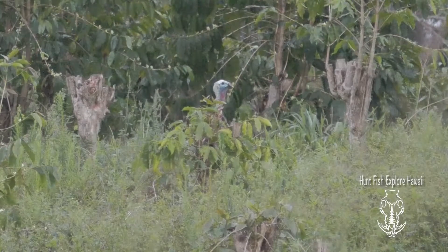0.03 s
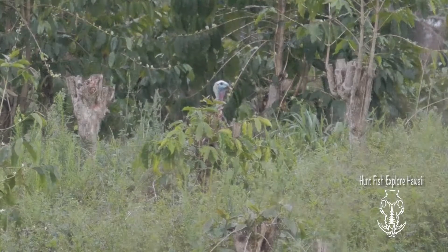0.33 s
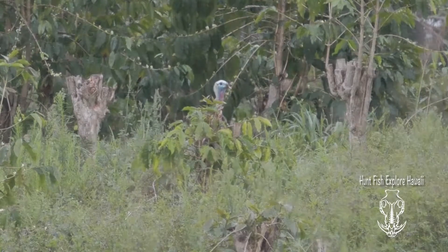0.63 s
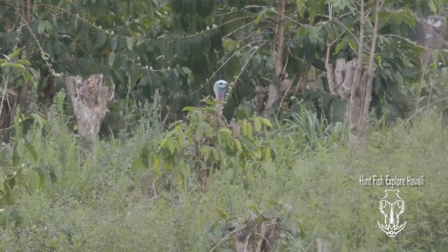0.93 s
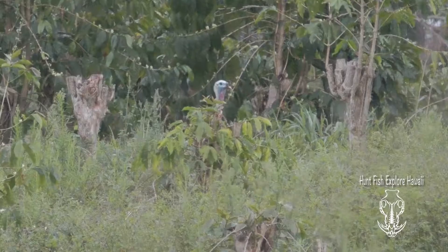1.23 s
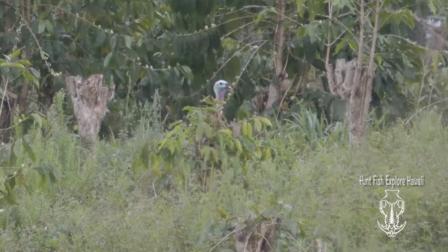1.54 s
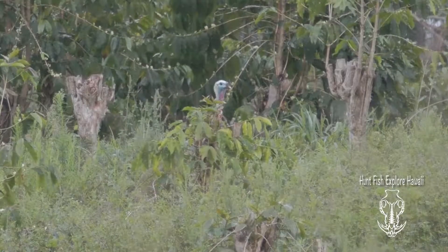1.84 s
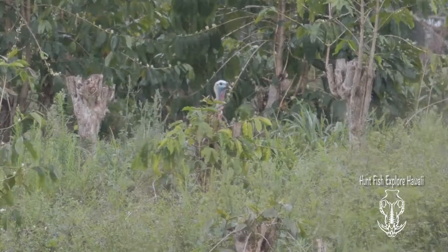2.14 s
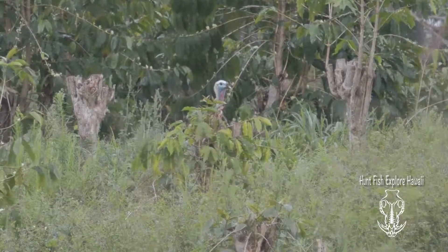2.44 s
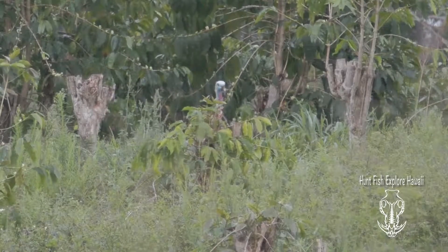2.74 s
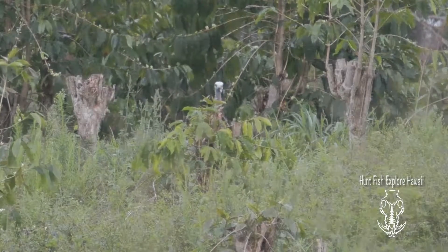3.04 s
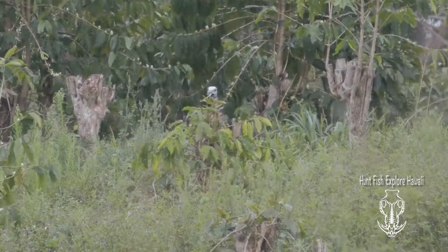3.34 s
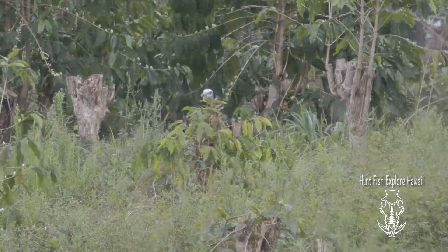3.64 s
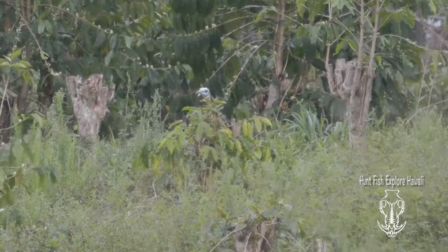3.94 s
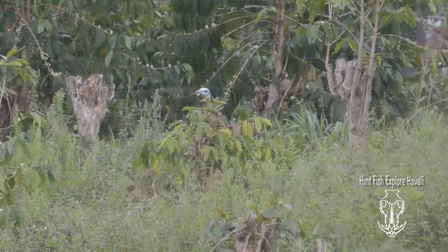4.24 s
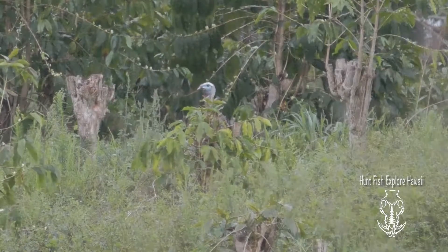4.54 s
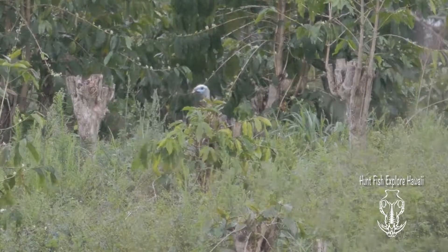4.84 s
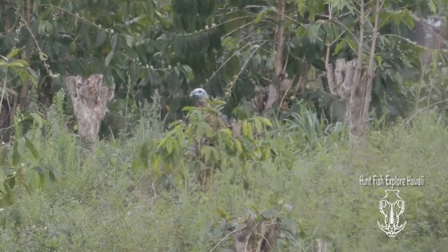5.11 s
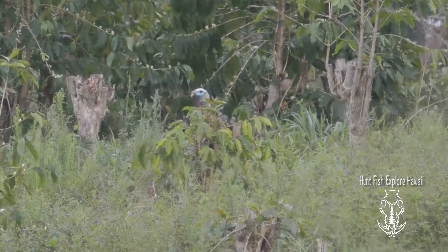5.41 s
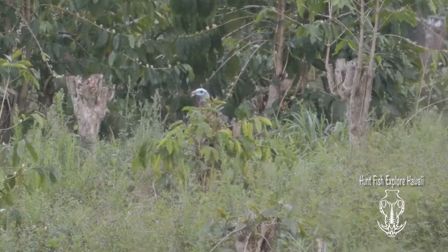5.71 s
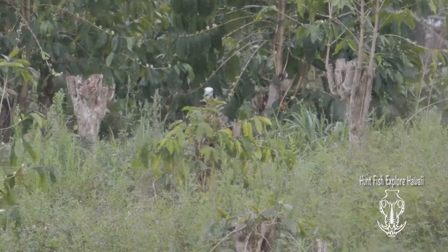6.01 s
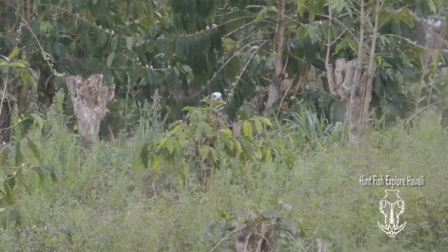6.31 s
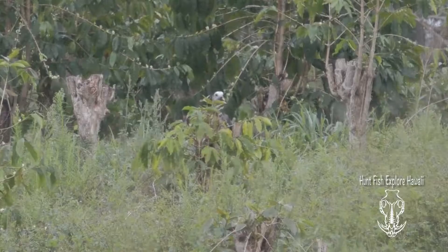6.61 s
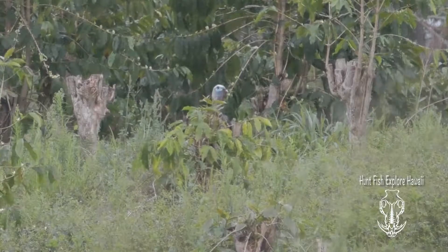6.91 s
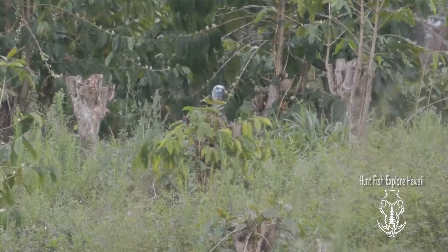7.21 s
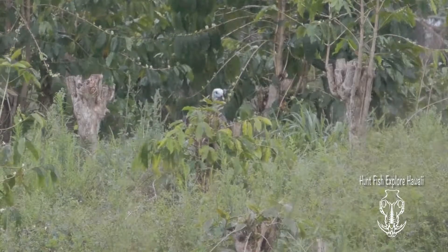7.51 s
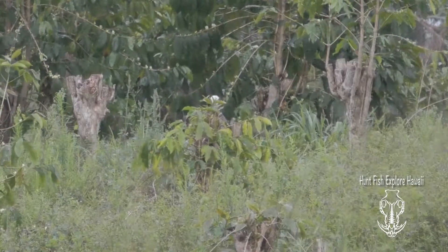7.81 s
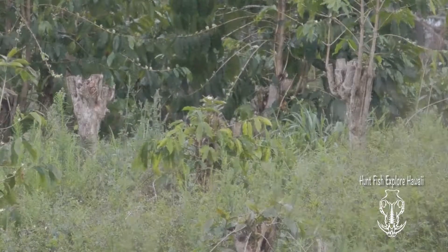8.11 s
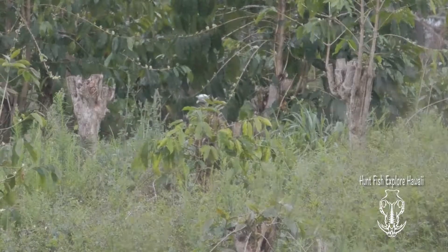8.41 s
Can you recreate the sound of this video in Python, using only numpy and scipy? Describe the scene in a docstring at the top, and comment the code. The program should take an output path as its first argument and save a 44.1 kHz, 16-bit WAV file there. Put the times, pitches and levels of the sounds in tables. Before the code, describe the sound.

At a forest edge, a wild turkey hen close to the microphones gives one short putt and a few sharp clucks, then twelve evenly paced yelps, each breaking from a high whistle into a raspy note. Soft whines slip between them, and a low rumble on the right follows her loud calls. Crickets trill, leaves rustle and small birds twitter far off, carrying on after she stops.

```python
"""A forest edge, tall grass, a pair of microphones. Leaves rustle, crickets trill, small birds twitter
far off. Close by, a wild turkey hen gives a putt, a few sharp clucks and twelve yelps with soft whines
between. Each yelp leaves her syrinx as a high whistle and breaks down into a raspy, reedy note; trunks
and leaves scatter it. Her loud calls set off a rumble in the right channel, and the background dips
under them. A faint low hum comes in near the end."""
import sys
import numpy as np
from scipy import signal
from scipy.fft import rfft, irfft
from scipy.io import wavfile
from scipy.ndimage import uniform_filter1d

SR = 44100
rng = np.random.default_rng(int(sys.argv[2]) if len(sys.argv) > 2 else 0)


def generate_wav(signal):
    """Clip the signal to [-1, 1] and save it as 16-bit WAV at the path in sys.argv[1]."""
    frames = np.transpose(np.atleast_2d(signal))
    scaled = np.clip(frames, -1, 1) * 32767
    pcm = np.round(scaled).astype(np.int16)
    wavfile.write(sys.argv[1], SR, pcm)


N = 377055
TIME = np.arange(N) / SR


def from_db(db):
    """Decibels to gain."""
    return 10 ** (np.asarray(db) / 20)


def rms_one(x):
    """Scale to rms 1."""
    return x / np.sqrt(np.mean(x ** 2) + 1e-20)


def at_hz(points, hz, column=1):
    """Read a column of a table on a log-frequency axis."""
    table = np.array(points)
    return np.interp(np.log(hz), np.log(table[:, 0]), table[:, column])


def band(x, low_hz, high_hz, order=2):
    """Butterworth band-pass."""
    return signal.sosfilt(signal.butter(order, [low_hz, high_hz], "band", fs=SR, output="sos"), x)


def drift(rate_hz, size=N):
    """Smooth random wander of spread 1."""
    pole = np.exp(-20 * np.pi * rate_hz / SR)
    noise = rng.standard_normal(size // 10 + 4002)
    slow = signal.lfilter([1], [1, -2 * pole, pole * pole], noise)[4000:]
    return np.interp(np.arange(size) / 10, np.arange(len(slow)), rms_one(slow))


def past(age, mark_s=0):
    """Time since a mark, zero before it."""
    return np.maximum(age - mark_s, 0)


def add(out, start_s, sound):
    """Mix a sound in at its time."""
    i = max(0, round(start_s * SR))
    out[..., i:i + sound.shape[-1]] += sound[..., :N - i]


def glide(length_s, start_hz, end_hz):
    """Phase and rounded envelope of a sliding note."""
    progress = np.linspace(0, 1, max(int(length_s * SR), 20))
    hz = start_hz * (end_hz / start_hz) ** progress * (1 + 0.017 * drift(120, len(progress)))
    return 2 * np.pi * np.cumsum(hz) / SR, 2 * np.sin(np.pi * progress)


# spectrum of the far foliage: f/Hz, relative level/dB
RUSTLE = [(25, -8.5), (60, -7.5), (120, 1), (300, -3), (550, -11), (800, -15.5), (1200, -7), (2400, -4),
          (3700, -6.5), (5200, -12.5), (7500, -23), (10000, -23.5), (15500, -23.5)]
# how alike it is at the two microphones: f/Hz, correlation
LIKENESS = [(60, 0.42), (300, 0.32), (1200, 0.52), (3000, 0.73), (5000, 0.78), (7000, 1), (15000, 0.32)]
def breeze(level_db=-50.5):
    """Air moving through distant leaves: a smooth rustle, wide in the bass."""
    hz = np.maximum(np.arange(N // 2 + 1) * SR / N, 1)
    alike = at_hz(LIKENESS, hz)
    mid, side = rfft(rng.standard_normal((2, N))) * from_db(at_hz(RUSTLE, hz))
    air = irfft(np.sqrt(1 + alike) * mid + np.sqrt(1 - alike) * side * [[1], [-1]], N)
    return from_db(level_db) * rms_one(air)


# the cricket chorus, opening and closing stretch: t/s, level/dB before trim
CHORUS = [
    [(0.0, -43.5), (0.834, -42.5), (1.2, -44.5)],
    [(6.9, -43.5), (7.35, -44), (8.55, -44)],
]
def crickets(count=15, centre_hz=4374, spread_hz=135, stroke_hz=28.49, sweep=0.0298, trim_db=-3):
    """Each wing stroke is a short falling tone; every insect keeps its own pitch, pace and place."""
    out = np.zeros((2, N))
    for k, detune in enumerate(np.linspace(-2, 2, count)):
        pace, start = rng.normal(0, 1, 2)
        stroke = (stroke_hz * (1 + .09 * pace) * TIME + start + .15 * drift(5)) % 1
        hz = (centre_hz + spread_hz * detune) * (1 + sweep * (.5 - stroke) + 0.0089 * drift(198.2))
        phase = 2 * np.pi * (np.cumsum(hz) / SR % 1)
        lead = np.cos(2 * k) / 2 * np.array([[1], [-1]])
        overtones = from_db(-19.5) * np.sin(2 * phase) + from_db(-25) * np.sin(3 * phase + lead)
        tone = np.sin(phase + lead) + overtones
        out += tone * np.sin(np.pi * stroke) ** 2 * np.exp(-detune ** 2 / 4)
    times, db = np.vstack(CHORUS).T
    return from_db(np.interp(TIME, times, db) + trim_db) * rms_one(out)


# the nearer songbirds: t/s, length/s, start f/Hz, end f/Hz, level/dB before trim
TWEETS = [(0, .051, 5270, 5000, -50), (0.413, 0.036, 5400, 6900, -57), (0.45, .02, 6900, 5000, -55),
          (0.777, .03, 6700, 5140, -58), (0.871, .028, 6200, 5100, -54.5), (1.097, .056, 7000, 5000, -57.5),
          (1.139, 0.068, 6300, 4860, -52), (1.475, 0.052, 5400, 5000, -52), (1.653, 0.071, 5600, 6870, -58),
          (1.866, 0.048, 5740, 4800, -56), (2.178, 0.043, 5000, 6200, -55),
          (2.211, 0.049, 5970, 5670, -53.5), (2.352, .13, 5670, 4480, -53), (2.697, .047, 5250, 6300, -61),
          (6.979, 0.096, 6950, 5100, -60.5), (7.444, .14, 7900, 7600, -65)]
def songbirds(count=130, far_db=-63.5, warble_db=-60, trim_db=-0.5):
    """Thin quick slurs, a few near and many far that thin out with time, over a lower distant warble."""
    notes = list(TWEETS)
    for when, length, high, end in rng.random((count, 4)):
        notes.append((when ** 1.5 * N / SR, 0.021 + 0.036 * length,
                      5600 + 2000 * high, 4800 + 1200 * end, far_db - 4 * high))
    for when, length, high, end in rng.random((count, 4)):
        hz = 2200 + 1300 * high
        notes.append((when * N / SR, 0.0398 + 0.069 * length, hz, hz * (.88 + 0.2075 * end), warble_db))
    out = np.zeros(N)
    for start_s, length_s, start_hz, end_hz, db in notes:
        phase, swell = glide(length_s, start_hz, end_hz)
        add(out, start_s, from_db(db + trim_db) * swell * np.sin(phase))
    return forest(np.array([out, out]), near_db=-8, near_t60=.12, far_db=-13, far_t60=.6)


def forest(x, near_db=-15, near_t60=0.071, far_db=-33, far_t60=1.0, stir_hz=45):
    """A quick scatter of echoes from near bushes, and a faint long one blurred by moving leaves."""
    t = TIME[:SR]
    sparse = rng.standard_normal((2, SR)) * (rng.random((2, SR)) < .05)
    echoes = band(sparse, 740, 5400, order=1) * (t > .006)
    tails = [rms_one(echoes * from_db(-60 * t / t60)) / np.sqrt(SR) for t60 in (near_t60, far_t60)]
    near, far = [signal.fftconvolve(x, tail, axes=1)[:, :N] for tail in tails]
    return x + from_db(near_db) * near + from_db(far_db) * far * drift(stir_hz)


# the hen, close by, one clear putt and one faint: t/s, f/Hz, level/dB, decay/s
PUTTS = [(.271, 1410, -18, 0.0041), (.992, 875, -44, 0.0071)]
def putts(rise_s=0.0019, lower_ratio=0.78):
    """With the beak closed, two partials ring for a few milliseconds."""
    out = np.zeros((2, N))
    t = TIME[:SR // 10]
    attack = 1 - np.exp(-(t / rise_s) ** 2)
    for start_s, hz, db, decay_s in PUTTS:
        ring = np.sin(2 * np.pi * hz * t) + 0.36 * np.sin(2 * np.pi * hz * lower_ratio * t)
        add(out, start_s, from_db(db) * ring * attack * np.exp(-t / decay_s))
    return out


def loudness(x):
    """Amplitude over a few milliseconds."""
    return np.sqrt(np.abs(uniform_filter1d(x ** 2, size=256)))


def dip(voice, depth_db=9.5, full_amplitude=0.22, recover_s=0.075):
    """Background gain: it sinks when a call is loud at the right microphone, then comes back."""
    log_push = np.log(np.clip(loudness(voice[1]) / full_amplitude, 1e-6, 1))
    held = np.maximum.accumulate(log_push + TIME / recover_s) - TIME / recover_s
    return from_db(-depth_db * np.exp(held))


# narrow peaks from ground reflections between hen and microphones:
# f/Hz, half width/Hz, level/dB above the valleys
GROUND_PEAKS = [(1469, 45, 6), (1674, 104, 4.5), (2282, 61, 5), (2405, 82, 3), (2770, 59, 8),
                (3090, 45, 7.5), (3748, 44, 6), (4060, 110, 4.5)]
def ground_reflection_db(hz, valley_db=-3.5):
    """Direct and reflected paths interfere, so a harmonic swells as it slides through a peak."""
    return valley_db + sum(db * np.exp(-((hz - peak) / width) ** 2) for peak, width, db in GROUND_PEAKS)


# from the hen to the microphones: f/Hz, left minus right level/dB, left lead/rad
BEARING = [(750, 6, 1), (1120, 4, 1.5), (1446, -3, -0.55), (1664, -5, -2.5), (2243, 6.5, 1.5),
           (2880, 7, -0.9), (3930, -5.5, -1), (5000, 0, 0.5)]
def at_microphones(level, phase, hz):
    """One partial as the pair hears it: level and phase differ with frequency."""
    tilt = from_db(at_hz(BEARING, hz))
    lead = at_hz(BEARING, hz, column=2) / 2
    pair = np.array([tilt * np.sin(phase + lead), np.sin(phase - lead)])
    return 2 * level / np.sqrt(1 + tilt ** 2) * pair


# her throat's colour on the upper harmonics: f/Hz, relative level/dB
THROAT = [(2200, -0.5), (2450, -2.5), (2800, -2.5), (3050, -7.5), (3750, -7), (4100, -7), (4500, -24),
          (5200, -23.5), (6000, -23), (6800, -28), (7500, -36.5), (8250, -35.5), (10000, -49),
          (14000, -48.5)]
def syrinx(pitch, first_db, octave_db, upper_db, beak_db, rough_s, pop_db, pop_hz):
    """Membranes buzz on one pitch: a whistle when high, reedy when low, raspy around rough_s."""
    flutter_hz, shimmer, fade_db = 130, .15, 1.1
    rough_width_s, attack_s, pop_s = .024, .003, .0033
    size = len(pitch)
    age = TIME[:size]
    rough = np.exp(-((age - rough_s) / rough_width_s) ** 2)
    # tight, high-pitched membranes hardly touch, so the high harmonics fade
    tight = np.clip((pitch - 790) / 140, 0, 1)
    jitter = (.0035 + .012 * rough) * drift(2 * flutter_hz, size)
    wobble = .004 * drift(25, size)
    pitch = pitch * (1 + jitter + wobble)
    phase = 2 * np.pi * np.cumsum(pitch) / SR
    shake = drift(flutter_hz, size)
    out = np.zeros((2, size))
    for k in range(1, 18):
        colour_db = at_hz(THROAT, k * pitch) + beak_db * (k > 3) - 6 * tight * np.sqrt(abs(k - 3))
        level = from_db(first_db if k == 1 else octave_db if k == 2 else upper_db + colour_db)
        if 2 <= k <= 5:
            level = level * from_db(ground_reflection_db(k * pitch))
        waver = 1 + shimmer * (.5 + 2 * rough) * (shake + drift(flutter_hz, size)) / 2
        # paths through the grass interfere: partials fade at each microphone, the overtones most
        paths = np.array([drift(40, size) for side in "LR"])
        fading = from_db(fade_db * min(k / 2, 2) * (paths + paths.mean(axis=0)))
        out += fading * at_microphones(level * waver, k * phase, k * pitch)
    # air leaks through the membranes once a cycle
    hiss = band(rng.standard_normal((2, size)), 1050, 5300) * (1 + np.cos(phase))
    out += from_db(upper_db) * (from_db(-26) + from_db(-19) * rough) * rms_one(hiss)
    # an abrupt start also pops the throat
    since = past(age, attack_s) / pop_s
    pop = from_db(pop_db) * since * np.exp(1 - since) * np.sin(2 * np.pi * pop_hz * age)
    out = (out + 2 * pop) * np.clip(age / attack_s, 0, 1)
    # a small beak radiates nothing far below the fundamental
    return band(out, 780, 15000, order=4)


# sharp clucks, close by: t/s, hold/s, f/Hz,
# relative level/dB of fundamental, octave and upper harmonics, beak lift/dB
CLUCKS = [(1.257, 0.027, 758.6, -29, -20, -27, -6.5), (1.401, 0.016, 737.4, -31, -17.3, -23.5, -7.5),
          (1.551, 0.016, 777, -17.5, -19.5, -22.5, -5), (1.777, 0.028, 742.4, -28, -17.5, -20.5, -7.5),
          (2.023, 0.018, 722, -30, -18.3, -22.5, -9), (2.277, 0.017, 778, -32, -24.5, -29, -10),
          (2.312, 0.018, 743, -34, -21.5, -26.5, -6)]
def clucks(length_s=.098, drop_hz=123.5, drop_s=0.00442, rise_hz_per_s=1020, knock_s=0.0097, trim_db=-2.7):
    """Abrupt notes whose pitch drops at once and creeps back; the fundamental is only a brief knock."""
    sag_db_per_s, release_db_per_s, beak_db_per_s = 102, 552, 119.5
    out = np.zeros((2, N))
    age = np.arange(0, length_s, 1 / SR)
    for start_s, hold_s, low_hz, first_db, octave_db, upper_db, beak_db in CLUCKS:
        pitch = low_hz + drop_hz * np.exp(-age / drop_s) + rise_hz_per_s * age
        release_db = -release_db_per_s * past(age, hold_s)
        reed_db = release_db - sag_db_per_s * age
        knock_db = release_db - np.interp(age, [knock_s / 2, knock_s], [0, 12])
        note = syrinx(pitch, first_db + knock_db, octave_db + 3 + reed_db, upper_db + .5 + reed_db,
                      beak_db + beak_db_per_s * age, rough_s=.012, pop_db=upper_db - 9, pop_hz=1068)
        add(out, start_s, note)
    return from_db(trim_db) * out


def rumble(voice, gain_db=-5.5, corner_hz=58, threshold=0.0019):
    """A lumpy low noise in the right channel that follows the shrill part of the calls."""
    low_noise = band(rng.standard_normal(N), 26, corner_hz, order=1)
    lumps = rms_one(band(low_noise, 5.1, 360, order=1))
    shrill = loudness(band(voice[1], 2540, 5400))
    return from_db(gain_db) * lumps * np.maximum(shrill - threshold, 0) * np.array([[0], [1]])


# the run of yelps, close by: break t/s, whistle before it/s, hold after it/s, end after it/s, fall/s,
# low f/Hz, scoop/Hz, relative level/dB of whistle, octave and upper harmonics, beak lift/dB
YELPS = [(2.541, 0.012, 0.12, 0.12, 0.013, 739.7, -21.5, -32.4, -17.5, -24.5, -8.6),
         (2.871, 0.023, 0.12, 0.14, 0.011, 735, 27.5, -32, -17.5, -24, -5.5),
         (3.212, 0.018, 0.106, 0.14, 0.016, 735.4, 29.5, -30, -17, -22.5, -5.5),
         (3.575, 0.03, 0.13, 0.16, 0.016, 744.4, 34, -29, -17.5, -23.5, -3),
         (3.937, 0.022, 0.13, 0.16, 0.023, 733.7, 58, -28.5, -17, -23.5, -1.5),
         (4.312, 0.027, 0.14, 0.17, 0.0091, 759, 71.0, -28, -18.5, -23, -5),
         (4.68, 0.027, 0.11, 0.13, 0.01, 748, 69.5, -27, -17, -24.5, -2),
         (5.049, 0.032, 0.14, 0.15, 0.011, 747.3, 43.5, -28, -19, -22, -5),
         (5.407, 0.026, 0.1, 0.158, 0.0085, 750.0, 140.0, -28, -19, -22.5, -3.5),
         (5.781, 0.032, 0.107, 0.15, 0.0092, 750.0, 59.5, -28, -19, -23, -3),
         (6.157, 0.031, 0.11, 0.15, 0.011, 745.6, 87, -29, -18, -23.5, -3),
         (6.542, 0.031, 0.082, 0.12, 0.0078, 751.6, 39.0, -29, -17, -23.5, -3.5)]
# the reedy note swelling in: t/s from the break, relative level/dB
REED_ATTACK = [(-.02, -35.5), (-.001, -7), (.027, -0.5)]
# the octave slumps after each crest, further as the run goes on: t/s, loss/dB
SLUMP = [(2.6, 1.5), (3.3, 2), (4.3, 3.5), (6.5, 5)]
def yelps(whistle_hz=1032, scoop_s=.06, scoop_width_s=.1, catch_s=0.0086, trim_db=0.03):
    """Each whistle falls through a break into a scooped reedy note, which sags, lets go and stops."""
    whistle_sag, octave_sag, upper_sag, release, stop = 65.5, 27, 78.5, 314, 1002  # dB per second
    out = np.zeros((2, N))
    for (break_s, whistle_s, hold_s, end_s, fall_s, low_hz, scoop_hz,
         whistle_db, octave_db, upper_db, beak_db) in YELPS:
        age = np.arange(-whistle_s, end_s + .028, 1 / SR)
        fall = (whistle_hz - low_hz) / (1 + np.exp(age / fall_s))
        scoop = scoop_hz * ((past(age) - scoop_s) / scoop_width_s) ** 2
        breath_db = np.interp(age + whistle_s, [0, .008], [-21, 0]) - stop * past(age, end_s)
        # the whistle catches just before the break, then gives way to the reedy note
        accent_db = np.interp(age, [-2 * catch_s, -catch_s, 0, .024], [3.5, -2, 0, -8.5])
        reed_db = breath_db + np.interp(age, *np.transpose(REED_ATTACK)) - release * past(age, hold_s)
        slump_db = np.interp(break_s, *np.transpose(SLUMP)) * np.interp(age, [.032, .056], [0, 1])
        # the beak opens and lifts the top harmonics
        opening_db = np.interp(age, [0, .044], [0, 2])
        note = syrinx(low_hz + fall + scoop,
                      whistle_db + breath_db + accent_db - whistle_sag * past(age),
                      octave_db - .45 + reed_db - octave_sag * age - slump_db,
                      upper_db - .37 + reed_db - upper_sag * age,
                      beak_db + opening_db, rough_s=whistle_s + .012, pop_db=whistle_db - 8.5, pop_hz=1065)
        add(out, break_s - whistle_s, note)
    return from_db(trim_db) * out


# soft whines among the yelps: t/s, length/s, start f/Hz, end f/Hz, level/dB
WHINES = [(3.432, 0.08, 598, 713, -50.5), (3.82, 0.053, 616, 680, -58), (5.224, 0.046, 673, 630, -56.5),
          (6.304, 0.061, 597, 683, -54.5), (6.418, 0.031, 707, 616, -62), (6.672, 0.038, 612, 680, -58),
          (6.844, 0.026, 580, 607, -61.5)]
# their harmonics two to five: relative level/dB
WHINE_HARMONICS = [4.5, 7, -4, -6]
def whines():
    """Quiet sliding notes with no fundamental, alike at both microphones."""
    out = np.zeros((2, N))
    for start_s, length_s, start_hz, end_hz, db in WHINES:
        phase, swell = glide(length_s, start_hz, end_hz)
        tone = sum(from_db(db + part_db) * np.sin(k * phase) for k, part_db in enumerate(WHINE_HARMONICS, 2))
        add(out, start_s, swell * tone)
    return out


def hum(start_s=7.1, hz=109, level_db=-62):
    """A faint, wavering low tone, centred between the microphones."""
    phase = 2 * np.pi * np.cumsum(hz + 2 * drift(14.4)) / SR
    return from_db(level_db) * np.sin(phase) * np.clip((TIME - start_s) * 10, 0, 1)


def scene():
    """The hen in front of the steady life of the forest edge."""
    hen = forest(putts() + clucks() + yelps() + whines())
    return hen + rumble(hen) + dip(hen) * (breeze() + hum() + crickets() + songbirds())


def record(dry, cutoff_hz=15760):
    """The top is cut steeply on both channels."""
    return signal.sosfilt(signal.ellip(12, .1, 80, cutoff_hz, fs=SR, output="sos"), dry)


dry = scene()
out = record(dry)
generate_wav(out)
```